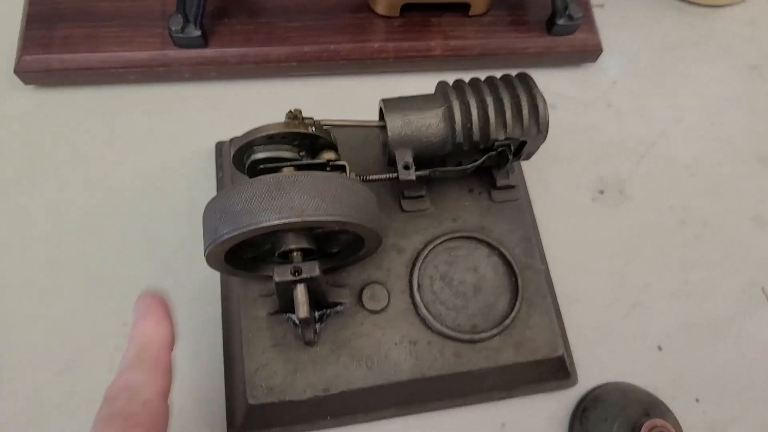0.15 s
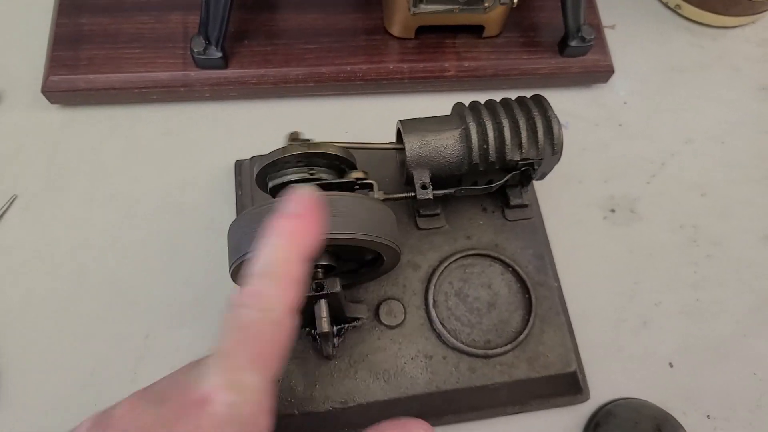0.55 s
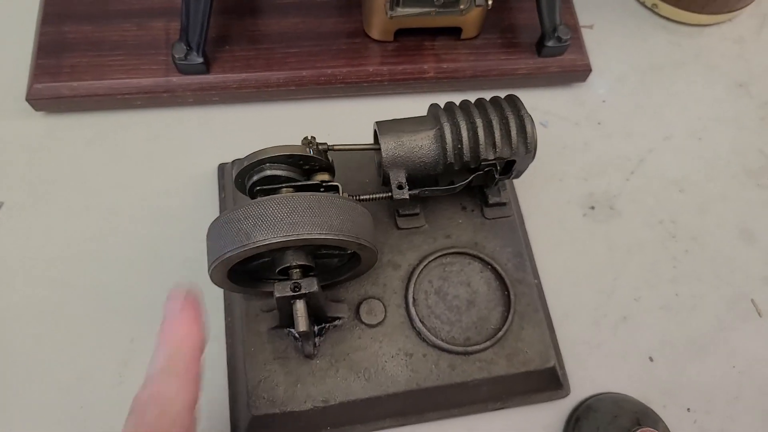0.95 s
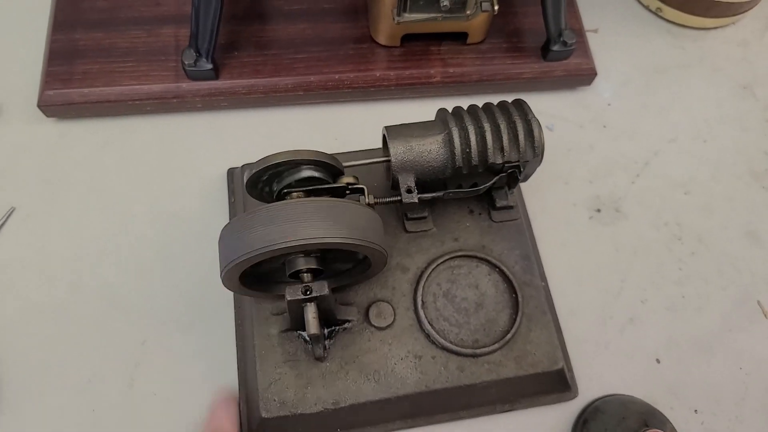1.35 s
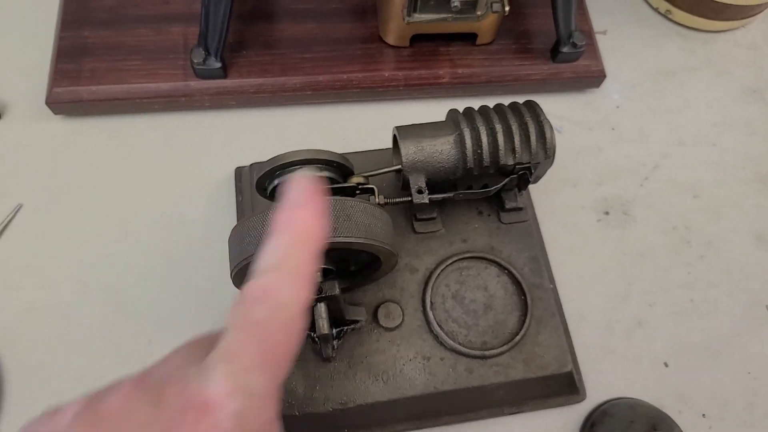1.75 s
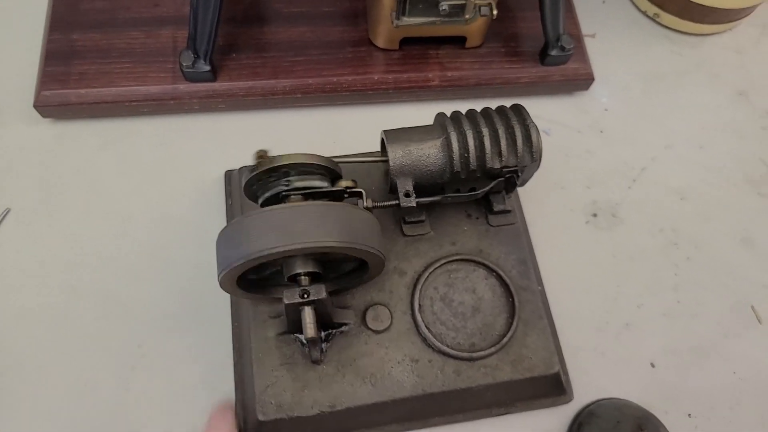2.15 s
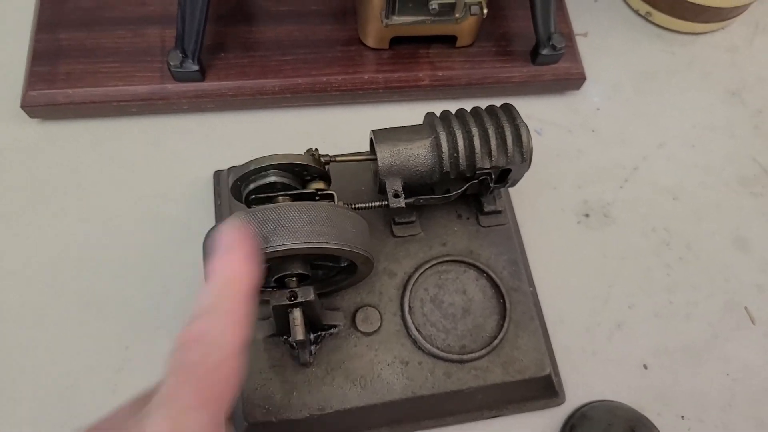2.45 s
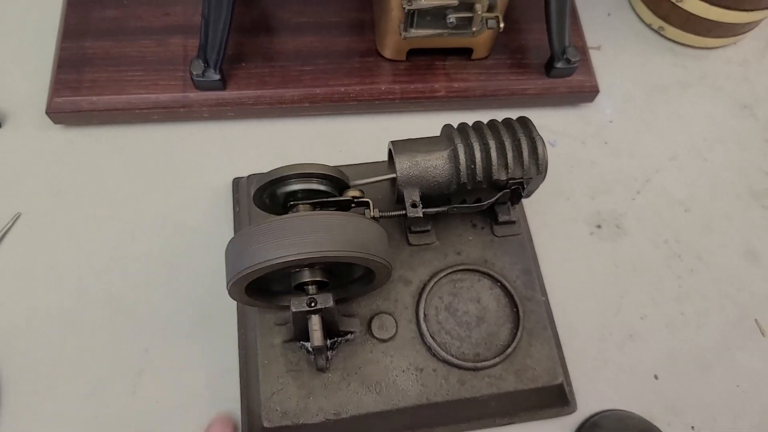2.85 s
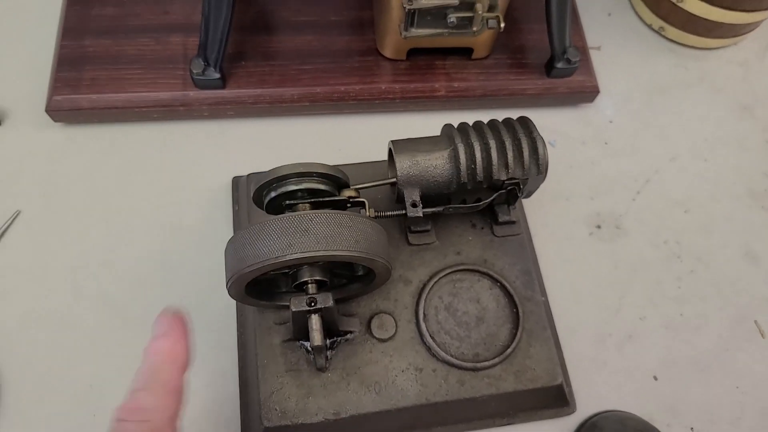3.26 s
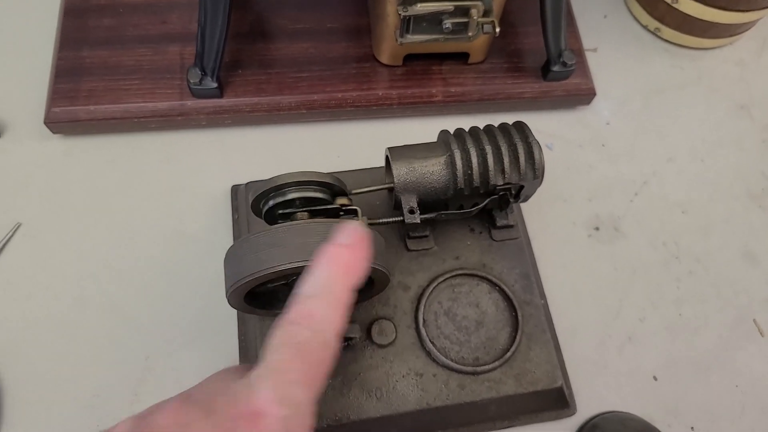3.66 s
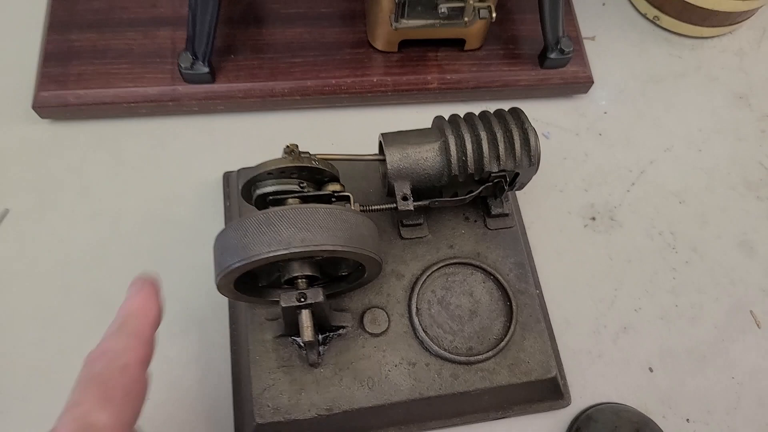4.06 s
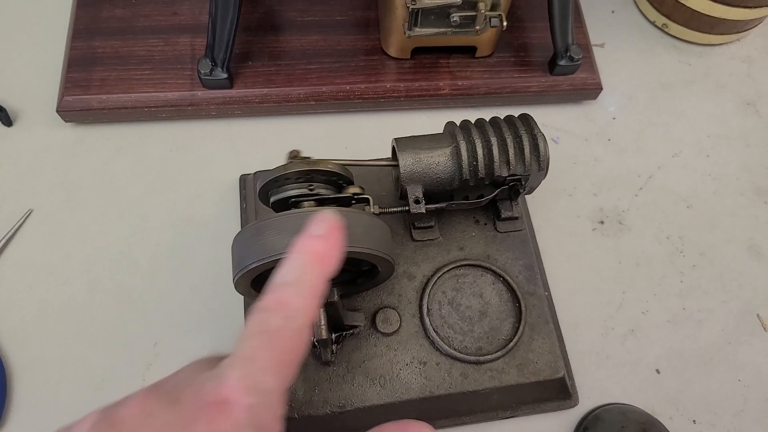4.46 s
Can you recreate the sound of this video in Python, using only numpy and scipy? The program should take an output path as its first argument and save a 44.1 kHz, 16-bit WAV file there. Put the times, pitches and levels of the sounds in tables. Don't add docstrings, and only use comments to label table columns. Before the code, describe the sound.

Close, dry sound of a small cast-metal model engine being pushed by a finger on a table. Light ticks lead into clattering knocks about 0.6, 1.3, 2.05 and 2.8 seconds, as the base rocks and lands with hollow thuds and short rings. A quieter gap follows, with faint touches near 3.7 seconds, then a hard bright clack at 4.55. Quiet indoor room, short tail, close stereo microphone.

```python
import sys
import numpy as np
from scipy import signal
from scipy.fft import rfft, irfft, next_fast_len
from scipy.io import wavfile

SR = 44100
rng = np.random.default_rng(int(sys.argv[2]) if len(sys.argv) > 2 else 0)


def pcm_store(signal):
    levels = np.round(np.clip(np.atleast_2d(signal), -1, 1) * 32767)
    wavfile.write(sys.argv[1], SR, levels.astype(np.int16).T)


def elevation(decibels):
    levels = np.asarray(decibels, float)
    return 10 ** (levels / 20)


N = 203197


def at_hz(points, hz, column=1):
    points = np.array(points)
    return np.interp(np.log(hz), np.log(points[:, 0]), points[:, column])


def rms_one(x):
    return x / np.sqrt(np.mean(x ** 2) + 1e-20)


def spectrum_size(length):
    size = next_fast_len(length)
    return size, np.arange(size // 2 + 1) * SR / size + 1


def filtered(x, order, hz, kind="low"):
    return signal.sosfilt(signal.butter(order, hz, kind, fs=SR, output="sos"), x)


def clicks(seconds, db):
    out = np.full(N, 1e-18)
    np.add.at(out, (np.asarray(seconds) * SR).astype(int), elevation(db))
    return out


def ring(x, hz, t60):
    radius, turn = elevation(-60 / (t60 * SR)), 2 * np.pi * hz / SR
    return signal.lfilter([0, np.sin(turn)], [1, -2 * radius * np.cos(turn), radius * radius], x)


def contact(x, length_s):
    bump = np.hanning(max(int(length_s * SR), 3) + 2)
    return np.convolve(x, bump / bump.sum())[:N]


def strike(modes, s, db, spread_db):
    chance = rng.normal(0, 1, (len(s), len(modes)))
    out = 0
    for k, (hz, mode_db, t60) in enumerate(modes):
        out = out + ring(clicks(s, db + mode_db + spread_db * chance[:, k]), hz, t60)
    return out


def single_rings(rows):
    out = np.zeros(N)
    for s, db, hz, t60 in rows:
        start = int(s * SR)
        t = np.arange(min(int(.4 * SR), N - start)) / SR
        swell = np.minimum(3 * hz * t, 1)
        out[start:][:len(t)] += elevation(db - 60 * t / t60) * swell * np.sin(2 * np.pi * hz * t)
    return out


def coloured(spectrum):
    size, hz = spectrum_size(N)
    white = rfft(rng.standard_normal(size))
    return rms_one(irfft(white * elevation(at_hz(spectrum, hz)), size)[:N])


def in_time(rows, rise_db_s, fall_db_s, rest_db):
    t = np.arange(N) / SR
    swells = []
    for s, db, hold_s in rows:
        away_db = np.maximum(rise_db_s * (s - t), fall_db_s * (t - s - hold_s)).clip(0)
        swells.append(db - away_db)
    return np.max(swells, axis=0).clip(rest_db)


# f/Hz, level/dB
AIR_COLOUR = [(12, -41), (20, -0.5), (71, 0), (265, -14), (772, -24.5), (1240, -23), (2120, -30),
              (3230, -45.5), (4530, -39.5), (5670, -35), (7510, -71), (14300, -51), (15800, -54),
              (16600, -70)]
# f/Hz, width/Hz, level/dB per Hz
AIR_HUMPS = [(1219, 140, -26.5), (2570, 160, -31.5), (3120, 850, -27.5), (5250, 87, -42), (9300, 1200, -57),
             (12740, 1700, -54)]
# f/Hz, likeness (1 same, -1 opposite)
AIR_LIKENESS = [(60, 0.99), (130, 0.93), (290, 1), (640, 0.5), (1410, -0.23), (3100, 0.012), (6820, 0.72),
                (15000, 0.88)]
# f/Hz, level/dB
AIR_BALANCE = [(60, -1), (110, -0.5), (200, -3.5), (380, 1.5), (700, -3), (1290, 6.5), (2380, 3),
               (4400, 4.5), (8120, 12.5), (15000, 7)]
AIR_DB = -60.5


def air():
    size, hz = spectrum_size(N)
    humps = 0
    for top_hz, width_hz, db in AIR_HUMPS:
        humps = humps + elevation(db) ** 2 / (1 + (2 * (hz - top_hz) / width_hz) ** 4)
    colour = np.sqrt(elevation(at_hz(AIR_COLOUR, hz)) ** 2 + humps)
    mid, side = rfft(rng.standard_normal((2, size))) * colour
    alike = np.clip(at_hz(AIR_LIKENESS, hz), -1, 1)
    both = np.sqrt(1 + alike) * mid + np.sqrt(1 - alike) * side * [[1], [-1]]
    balance = elevation(at_hz(AIR_BALANCE, hz) * np.array([[.5], [-.5]]))
    return elevation(AIR_DB + 2.5) * rms_one(irfft(both * balance, size)[:, :N])


EDGES_HZ = 22 * 2 ** np.arange(0, 9.7, 1 / 3)


def bands(size, gain, likeness):
    out, white = 0, rng.standard_normal((2, 2, size))
    for k, (low, high) in enumerate(zip(EDGES_HZ, EDGES_HZ[1:])):
        mid, side = filtered(white[k % 2], 2, [low, high], "band")
        hz = np.sqrt(low * high)
        alike = np.clip(at_hz(likeness, hz), -1, 1)
        out = out + gain(hz) * (np.sqrt(1 + alike) * mid + np.sqrt(1 - alike) * side * [[1], [-1]])
    return out


# f/Hz, t60/s, level/dB
TAIL = [(60.24, 0.21, -17.5), (155, 0.24, -2.5), (417, 0.19, 3.5), (1120, 0.3, 1), (1550, 0.21, 4),
        (3280, 0.16, 3.5), (7496, 0.097, 5), (15100, 0.091, 10.5)]
TAIL_DB, LATE_TAIL_DB, LATE_TAIL_SLOWER = -6, -15.5, 1.7


def room(x):
    t = np.arange(SR // 2) / SR

    def gain(hz):
        fall_db = 60 * t / at_hz(TAIL, hz)
        lean_db = at_hz(PORT_BALANCE, hz) * np.array([[.3], [-.3]])
        sides = elevation(at_hz(TAIL, hz, column=2) + lean_db)
        return sides * (elevation(-fall_db) + elevation(LATE_TAIL_DB - fall_db / LATE_TAIL_SLOWER))

    tail = bands(len(t), gain, AIR_LIKENESS) * (1 - np.exp(-(t / 0.0043) ** 2))
    tail = tail / np.sqrt(np.sum(tail ** 2) / 2)
    return elevation(TAIL_DB) * signal.fftconvolve(x[None], tail, axes=1)[:, :N]


# f/Hz, level/dB
PORT_BALANCE = [(60, 2), (110, 0), (200, 1.5), (380, 1), (700, -4), (1290, -6.5), (2380, -5.5), (4400, 4.5),
                (8120, 11), (15000, 17)]
# f/Hz, phase/radians
PORT_PHASE = [(0, 0), (1030, 0.2), (1890, 1.7), (2580, 0.6), (3270, -4.7), (3790, -4.7), (5250, -10.5),
              (7410, -4.1), (8790, -5.9), (9390, -0.7), (12100, 6.3), (14600, 16.7), (15200, 16.7),
              (16400, 19.5)]


def ports(x, lag_s):
    size, hz = spectrum_size(N + 4096)
    lead = .5j * np.interp(hz, *np.transpose(PORT_PHASE)) - 1j * np.pi * hz * lag_s
    half = elevation(at_hz(PORT_BALANCE, hz) / 2) * np.exp(lead)
    return irfft(rfft(x, size) * np.array([half, 1 / half]), size)[:, :N]


# f/Hz, level/dB, t60/s
TABLE = [(83.15, -37.5, 0.14), (105, -5.5, 0.067), (133.4, -7, 0.28), (182, 0, 0.21), (246.4, -3.5, 0.13),
         (295, -5.5, 0.15), (398, 0.5, 0.05), (403.6, -18.5, 0.023), (482, -9, 0.18), (556.6, -5.5, 0.1),
         (618, -5.5, 0.083)]


def table(force):
    return sum(elevation(db) * ring(force, hz, t60) for hz, db, t60 in TABLE)


# t/s, level/dB, hold/s
RUMBLES = [
    (.001, -39, 0.0088),
    (.62, -41.5, 0.13),
    (1.16, -56, 0.027),
    (1.28, -45.5, 0.19),
    (2.18, -41.5, 0.02),
    (2.63, -53.5, 0.086),
    (2.86, -40, 0.091),
    (3.7, -47.5, 0.033),
    (3.82, -49, 0.018),
]
RUMBLE_RISE_DB_S, RUMBLE_FALL_DB_S, RUMBLE_REST_DB = 146.5, 94, -64
# t/s, level/dB, hold/s
JOLTS = [(.001, -46, 0.0026), (.59, -39.5, 0.0058), (.69, -52, 0.025), (1.17, -60, 0.038),
         (1.275, -35.5, 0.036), (1.52, -60.5, 0.0071), (2.065, -28.5, 0.028), (2.18, -45.5, 0.025),
         (2.3, -68.5, 0.043), (2.75, -43, 0.00795), (3.03, -68.5, 0.02), (3.7, -63, 0.036),
         (3.83, -58, .02), (4.545, -55, 0.0037)]
JOLT_RISE_DB_S, JOLT_FALL_DB_S, JOLT_REST_DB = 449.5, 218.5, -85.5
# f/Hz, level/dB, t60/s
RATTLE = [(530, -6, 0.059), (860, 0, 0.0097), (1182.5, -7.5, 0.016), (1650, 1, 0.012), (2200, -5, 0.016),
          (2410, -4, 0.011), (2990, -3, 0.053), (3600, -8.5, 0.01), (4700, -20.5, 0.00549)]


def shaking():
    rumble_db = in_time(RUMBLES, RUMBLE_RISE_DB_S, RUMBLE_FALL_DB_S, RUMBLE_REST_DB)
    rattle_db = in_time(JOLTS, JOLT_RISE_DB_S, JOLT_FALL_DB_S, JOLT_REST_DB)
    low = filtered(rng.standard_normal(N), 2, 200.0)
    sizes = elevation(2.5 * np.minimum(rng.exponential(1, N), 5)) * rng.choice([-1, 1], N)
    touches = sizes * (rng.random(N) < 3500 / SR) + 1e-18
    dealt = rng.integers(0, len(RATTLE), N)
    rattle = 0
    for k, (hz, db, t60) in enumerate(RATTLE):
        rattle = rattle + elevation(db) * ring(touches * (dealt == k), hz, t60)
    return elevation(rumble_db - 1.0) * rms_one(table(low)) + elevation(rattle_db - 6.0) * rms_one(rattle)


# t/s, level/dB, f/Hz
BOBS = [(0.031, -42, 165.5), (0.078, -37, 96), (0.139, -40.5, 106.3), (0.298, -36.5, 86), (0.37, -41, 159),
        (0.553, -29.5, 195), (0.7, -42.5, 181.5), (0.761, -35, 168.2), (0.944, -42, 108.1),
        (0.976, -52.5, 186), (1.137, -46, 62.7), (1.236, -28, 114), (1.288, -29.5, 90.7), (1.415, -42, 239),
        (1.522, -35.5, 104.4), (2.031, -29, 79.6), (2.102, -46.5, 223), (2.156, -30, 102.3),
        (2.328, -36, 105), (2.545, -37, 82.5), (2.716, -31, 101), (2.745, -18.5, 140.7),
        (2.769, -18.5, 87.6), (2.858, -36, 170), (2.915, -29, 172), (3.015, -32.5, 99.6),
        (3.202, -45, 110.4), (3.461, -43.5, 75), (3.69, -58, 85), (3.801, -37.5, 188.8),
        (4.524, -36.5, 170.7)]
BOB_T60_S = 0.14


def bobs():
    out = np.zeros(N)
    for s, peak_db, hz in BOBS:
        start = int(s * SR)
        t = np.arange(min(int(.4 * SR), N - start)) / SR
        height = elevation(peak_db + 5.5 - 60 * t / BOB_T60_S) * (1 - np.exp(-t / 0.0082))
        out[start:][:len(t)] += height * np.sin(2 * np.pi * hz * t)
    return out


# t/s, level/dB, push into the table/dB over the touch, length/s
BRUSHES = [
    (0.5405, -38.5, 22, 0.004),
    (1.2271, -34.5, 18, 0.012),
    (2.0198, -31.5, 23.5, 0.0087),
    (2.7137, -31.5, 18, 0.0048),
    (3.685, -38, 18, 0.01),
    (3.7964, -48.5, -3.5, 0.01),
    (3.8117, -34.5, 12.5, 0.0066),
    (4.4643, -56, -11.5, 0.0059),
    (4.5057, -54, -28, 0.0066),
    (4.5161, -40.5, 24.5, 0.0032),
]
# t/s, level/dB, length/s
LONG_HISSES = [(0.543, -43, 0.026), (0.58, -32, 0.019), (1.328, -44, 0.13), (2.038, -43, 0.047),
               (2.75, -45.5, 0.093), (2.797, -32, 0.04), (3.684, -49, 0.042), (3.692, -55.5, 0.045),
               (3.758, -61, .12), (3.64, -64, 0.049), (4.48, -53.5, 0.057), (4.536, -52, 0.04)]
LONG_HISS_PUSH_DB = -18
# f/Hz, level/dB per Hz
SKIN = [(530, -18.5), (900, -12), (3150, 4), (3830, -6.5), (4540, 0), (8050, -17), (12900, -9.5),
        (15000, -10.5), (16500, -14)]
# f/Hz, level/dB, t60/s
WHEEL = [(5720, -34, 0.025), (9000, -44.5, 0.04)]
KNURL_GRAIN_DB, KNURL_GRAIN_S = 5, 0.0023
LET_GO_SHARE = 0.73


def brushes():
    t, stroke = np.arange(N) / SR, np.zeros(N)
    touches = BRUSHES + [(s, peak_db, LONG_HISS_PUSH_DB, length_s) for s, peak_db, length_s in LONG_HISSES]
    for s, peak_db, push_db, length_s in touches:
        middle_s = s + .003
        width_s = length_s / 2 * np.where(t > middle_s, LET_GO_SHARE, 1.3)
        stroke += elevation(peak_db - 11.5) * np.exp(-((t - middle_s) / width_s) ** 2)
    grain = rms_one(contact(rng.standard_normal(N), KNURL_GRAIN_S))
    skin = stroke * elevation(KNURL_GRAIN_DB * grain - 3.0) * coloured(SKIN)
    wheel = sum(elevation(db) * ring(skin, hz, t60) for hz, db, t60 in WHEEL)
    s, peak_db, push_db, length_s = np.transpose(touches)
    push = contact(clicks(s, peak_db + push_db - 10.0), 0.012)
    return skin + wheel + table(push)


# t/s, level/dB, f/Hz, t60/s
RIM = [(.546, -66, 9000, 0.037), (.576, -36, 3700, .04), (.577, -35.5, 4440, .05), (.577, -41, 6520, 0.041),
       (.577, -48, 8210, .04), (.577, -44, 9300, 0.042), (.577, -44, 11900, .03), (1.232, -66, 9000, .05),
       (1.341, -50.5, 7500, .03), (1.345, -40.5, 3600, 0.027), (2.025, -55.5, 6640, 0.041),
       (2.025, -54, 8950, 0.099), (2.718, -48.5, 9017, 0.1547), (3.69, -63, 5720, .1),
       (.543, -46, 5720, .14), (1.23, -51, 5720, .07), (2.719, -52, 5720, .05), (3.8025, -50.5, 8800, .01),
       (3.812, -50.5, 4900, 0.027), (4.505, -52, 6800, .02), (4.521, -58, 5720, 0.069)]


def rim():
    return single_rings(RIM)


# t/s, level/dB, f/Hz, t60/s
RODS = [
    (.4725, -60, 3600, 0.058),
    (.477, -41.5, 678.7, 0.032),
    (1.352, -42, 2170, 0.17),
    (1.39, -48, 2200, 0.13),
    (1.44, -52.5, 2120, 0.15),
    (1.353, -39.5, 2280, 0.1),
    (2.18, -46.5, 2475, 0.1),
    (3.811, -54, 2360, 0.053),
]


def rods():
    out = np.zeros(N)
    for s, db, hz, t60 in RODS:
        for ratio in (.994, 1.008):
            out += ring(clicks([s], db), hz * ratio, t60)
    return out


# f/Hz, level/dB per Hz
CRACK = [(880, -45.5), (1500, -6.5), (1870, -7.5), (5750, -13.5), (6430, -16.5), (10800, -21),
         (12600, -21.5), (15500, -24.5), (16500, -35.5)]


def cracks(train, t60):
    fading = signal.lfilter([1], [1, -elevation(-60 / (t60 * SR))], 1.014 * contact(train, 0.0012))
    return coloured(CRACK) * fading


# t/s, level/dB, f/Hz, t60/s, crack/dB over the tick
TICKS = [(0.37, -35.5, 1496, 0.021, -10.5), (0.375, -36.5, 1374, 0.041, -7),
         (0.47, -53.5, 1786, 0.061, -37), (0.7188, -36, 1404, 0.035, -13),
         (1.07, -39.5, 1574, 0.046, -41.5), (1.0688, -36.5, 1835, 0.021, -29),
         (1.1022, -35, 1706, 0.015, -33.5), (1.1134, -24.5, 1550, 0.031, -24),
         (1.9743, -53.5, 1790, 0.024, -23.5), (1.991, -54, 1490, 0.022, -15),
         (2.012, -25.5, 1500, 0.026, -13), (2.581, -36, 1474, 0.024, -30.5),
         (2.5815, -51, 2275, 0.047, -29), (2.5889, -33, 1496, 0.027, -14), (3.6413, -34.5, 1410, 0.041, -8),
         (3.6573, -39.5, 1434, 0.029, -24.5), (3.6746, -36, 1388, 0.0071, -25.5),
         (3.8031, -25, 1930, 0.0072, -33.5), (4.3539, -28, 1900, 0.0093, -27),
         (4.3607, -38.5, 1800, 0.014, -35)]
# t/s, level/dB, f/Hz, t60/s, crack/dB over the tick
CHATTER = [(0.5744, -20, 2220, 0.015, -23.5), (0.5755, -18, 1460, 0.018, -22),
           (0.58, -25.5, 1940, 0.038, -13), (1.3467, -12.5, 1984, 0.023, -17.5),
           (1.3505, -3.5, 2170, 0.01, -10.5), (2.0201, -29, 1570, 0.037, -19),
           (2.0278, -17, 1790, 0.0083, -17), (2.037, -36.5, 2920, 0.012, -16.5),
           (2.066, -17, 2940, 0.012, -15), (2.08, -31, 2610, 0.013, -14.5),
           (2.0925, -30.5, 3000, 0.02, -21.5), (2.1742, -24, 1674, 0.0097, -8),
           (2.788, -28, 2650, 0.017, -21.5), (2.7423, -33.5, 1390, 0.04, -16), (4.55, -24, 2200, 0.024, 0),
           (4.55, -11.5, 1740, 0.014, -19), (4.5545, -20, 2050, 0.018, -28)]
# ratio to its pitch, level/dB, ratio to its t60
LINK = [(0.999, 5, 0.92), (1.221, -5.5, 0.88), (1.358, -9.5, .5), (1.501, -24, .7)]
# t/s, level/dB
ARM_BLOWS = [(0.37, -38.5), (0.4723, -46), (.4768, -54), (.576, -17.5), (.7192, -41), (1.07, -47),
             (1.112, -42), (1.118, -35), (1.8398, -63), (2.0143, -30.5), (2.5899, -45.5), (2.742, -31),
             (3.6611, -42), (3.676, -39), (4.3545, -42.5), (4.3585, -37.5), (4.5476, -23.5), (4.553, -13.5)]
# f/Hz, level/dB, t60/s
ARM = [(795, 0.5, 0.019), (1193, -10, 0.036)]
# t/s, level/dB
DRY_CLICKS = [
    (0.1876, -32),
    (0.374, -35),
    (0.4724, -42),
    (.917, -37),
    (1.0973, -32.5),
    (1.488, -39),
    (1.834, -37),
    (2.621, -42),
    (4.358, -37),
]
DRY_BAND_HZ = [1900, 5000]


def ticks():
    joints = np.zeros(N)
    for s, peak_db, hz, t60, crack_db in TICKS + CHATTER:
        start = int(s * SR)
        t = np.arange(min(int(.2 * SR), N - start)) / SR
        rings = 0
        for ratio, db, longer in LINK:
            rings = rings + elevation(db - 60 * t / (t60 * longer)) * np.sin(2 * np.pi * hz * ratio * t)
        joints[start:][:len(t)] += elevation(peak_db - 5.5) * rings * (1 - np.exp(-t / .0008))
    s, peak_db, hz, t60, crack_db = np.transpose(TICKS + CHATTER)
    crack = cracks(clicks(s, peak_db + crack_db), t60=.006)
    arm_s, arm_db = np.transpose(ARM_BLOWS)
    arm = contact(strike(ARM, arm_s, arm_db - 5.5, spread_db=3.0), 0.0002)
    dry_clicks = filtered(clicks(*np.transpose(DRY_CLICKS)), 2, DRY_BAND_HZ, "band")
    return joints + arm + dry_clicks + filtered(crack, 1, 5000.0)


# t/s, level/dB, f/Hz, t60/s
HOLLOW = [(.5887, -15.5, 1055, 0.023), (.5895, -22.5, 562, 0.05), (.598, -33, 1143, 0.24),
          (.6, -37.5, 909, .16), (1.2625, -22, 897, 0.018), (1.2635, -27.5, 1160, 0.065),
          (1.262, -28.5, 181.4, .2), (1.348, -23, 1707, 0.055), (1.3553, -18.5, 1020, 0.028),
          (1.3555, -24.5, 295, 0.11), (1.358, -44, 1750, .2), (1.37, -37, 944, .06),
          (2.0553, -8, 1179, .022), (2.0584, -9, 1150, .015), (2.057, -23.5, 338, 0.033),
          (2.072, -27.5, 1134, 0.033), (2.0555, -16, 940, .03), (2.056, -14.5, 1550, 0.019),
          (2.056, -26.5, 1860, 0.037), (2.062, -18, 1083, 0.055), (2.058, -30.5, 252, 0.22),
          (2.7475, -21, 968, .03), (2.748, -25, 1790, 0.058), (2.75, -33.5, 265.5, 0.14),
          (2.752, -24.5, 469, 0.18), (2.8054, -17, 990, 0.034), (2.811, -24, 555, 0.071),
          (2.808, -23.5, 274.6, 0.11), (2.818, -34, 946, .1), (3.69, -37.5, 180, 0.16),
          (.476, -34, 400, .08), (1.37, -38, 1180, .25), (2.82, -38, 1150, .25), (2.1, -40, 1200, .2),
          (4.358, -44.5, 782, 0.074), (4.466, -53, 802, .04), (4.5633, -12, 1140, 0.027),
          (4.564, -21, 290, .12), (.59, -24.5, 291.6, .15), (4.354, -42.5, 1145, 0.04),
          (2.585, -51.5, 858, .05), (4.565, -27, 546, 0.12), (4.575, -28, 1106, 0.17)]


def hollow_base():
    return -single_rings(HOLLOW)


# t/s, slap/dB, table boom/dB, base plate/dB, late rebound/dB
FLAT = [
    (.589, 1, -32, -7, -12),
    (1.3553, 0, -23, -10, -27.5),
    (2.8057, 0, -21.5, -10.5, -37),
    (4.5636, 1.5, -26, -7, -13),
]
FLAT_CRACK_DB, FLAT_SECOND_DB = -16.5, -17.5
# delay/s, slap/dB, boom/dB, plate/dB, crack/dB
EARLY_REBOUND = (.0072, -14, -27.5, -29, -35.5)
# delay/s, slap/dB, boom/dB, plate/dB, crack/dB
LATE_REBOUND = (.019, 0.5, -15, -3, -24)
# t/s, slap of second edge/dB, boom/dB, plate/dB, crack/dB
ROCKING = [
    (1.2624, -34, -22.5, -11.5, -18.5),
    (2.0554, -14, -25, -11.5, -16),
    (2.7483, -25, -18, -9.5, -19),
]
# t/s, slap/dB, boom/dB, plate/dB,
# crack/dB
THUDS = [(.002, -41.5, -61.5, -46, -60), (0.103, -56, -42.5, -42.5, -83), (0.4766, -26.5, -27, -61, -80),
         (2.067, -23, -27, -51.5, -53), (2.177, -24, -43.5, -56, -53), (1.841, -51, -47, -65, -86),
         (2.278, -58, -41, -46.5, -71), (2.6306, -44.5, -47.5, -79.5, -88), (2.987, -75, -47, -47, -66),
         (3.804, -56, -47, -44, -48)]
EDGE_GAP_S, SILENT_DB = .0031, -90


def landings():
    rows = [(*thud, SILENT_DB) for thud in THUDS]
    early_s, *early = EARLY_REBOUND
    late_s, *late = LATE_REBOUND
    for s, slap_db, boom_db, plate_db, late_db in FLAT:
        rows += [(s, slap_db, boom_db, plate_db, FLAT_CRACK_DB, FLAT_SECOND_DB),
                 (s + early_s, *early, SILENT_DB),
                 (s + late_s, *(late_db + np.array(late)), SILENT_DB)]
    for s, slap_db, boom_db, plate_db, crack_db in ROCKING:
        rows += [(s, SILENT_DB, boom_db, plate_db, crack_db, SILENT_DB),
                 (s + EDGE_GAP_S, slap_db, boom_db, plate_db, SILENT_DB, SILENT_DB)]
    return rows


# f/Hz, level/dB, t60/s
PLATE = [(896, -6, 0.048), (980, -7, 0.025), (1096, 1, 0.018), (1082, 8, 0.013), (1245, -12.5, 0.058),
         (1410, -13, 0.033), (1714, -4, 0.019), (1831, -8.5, .025), (2170, -15, 0.023), (2617, -8, 0.019),
         (3040, -19.5, 0.037), (3225, -5.5, 0.025)]
# t/s, level/dB
CLINKS = [(.541, -36), (0.5754, -23), (0.5785, -38.5), (0.5795, -27), (0.5975, -21), (0.6081, -38),
          (0.611, -21), (0.62, -41), (1.2722, -40.5), (1.2859, -35), (1.3483, -20), (1.3705, -33),
          (1.3795, -46), (2.037, -43), (2.0667, -59.5), (2.0763, -44), (2.0775, -44.5), (2.089, -38.5),
          (2.743, -23), (2.765, -35), (2.7685, -39.5), (2.7879, -40), (2.8159, -45), (2.8215, -40),
          (2.828, -33.5), (2.1746, -32.5), (2.1765, -38), (3.6414, -37.5), (3.643, -41), (3.661, -56),
          (3.682, -62), (3.691, -51), (3.797, -56), (4.3597, -42), (4.506, -41), (4.519, -36),
          (4.5668, -11.5), (.3745, -47.5), (2.5867, -48), (1.3735, -44), (0.592, -27), (3.6865, -56),
          (3.8137, -42.5), (4.5485, -18.5), (4.5618, -11.5), (4.5748, -22), (4.58, -17.5), (4.5933, -25)]
SLAP_S, SLAP_LEAD_S, CRACK_LEAD_S, BOUNCE_S = .0024, .0017, .0011, .0032


def knocks():
    s, slap_db, boom_db, plate_db, crack_db, second_db = np.transpose(landings())
    phase = np.arange(0, 1, 1 / (SLAP_S * SR))
    squeeze = np.sin(2 * np.pi * phase) * (0.94 + 0.11 * phase)
    slap = np.convolve(clicks(s - SLAP_LEAD_S, slap_db - 6.5), squeeze)[:N]
    boom = contact(strike(TABLE, s - .0008, boom_db - 9.5, spread_db=7.5), 0.0013)
    plate = contact(strike(PLATE, s, plate_db - 13.5, spread_db=3.5), 0.0001)
    crack_s = s - CRACK_LEAD_S * (slap_db > SILENT_DB)
    crack = cracks(clicks(crack_s, crack_db) + clicks(s + BOUNCE_S, second_db), t60=0.0079)
    clinks = cracks(clicks(*np.transpose(CLINKS)), t60=0.0022)
    return slap - boom - plate + crack + clinks


LINKAGE_LAG_S = .00008
HOLLOW_LAG_S = .00012
SKIN_TAIL_DB, LINKAGE_TAIL_DB = -9.5, -10
TABLE_CUT_HZ = 62


def scene():
    base, hollow, skin = knocks(), hollow_base(), brushes()
    linkage = ticks() + rods() + rim()
    near = ports(base + bobs() + shaking(), lag_s=0)
    near = near + ports(linkage + skin, lag_s=LINKAGE_LAG_S) + ports(hollow, lag_s=HOLLOW_LAG_S)
    far = base + hollow + elevation(SKIN_TAIL_DB) * skin + elevation(LINKAGE_TAIL_DB) * linkage
    engine = near + room(far)
    return filtered(engine, 2, TABLE_CUT_HZ, "high") + air()


def top_cut(x):
    return signal.sosfilt(signal.butter(12, 16820, fs=SR, output="sos"), x)


def record(dry):
    thin = filtered(dry, 2, 18.0, "high")
    rounded = np.tanh(thin)
    finished = signal.sosfilt(signal.cheby2(10, 60, 17000, fs=SR, output="sos"), rounded)
    return top_cut(finished)


dry = scene()
out = record(dry)
pcm_store(out)
```